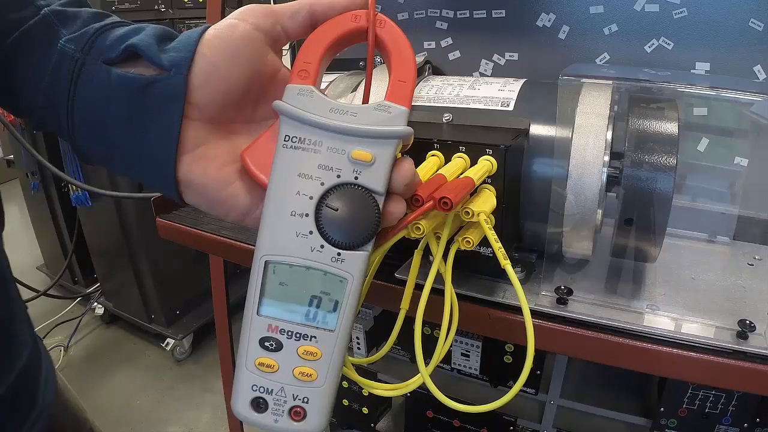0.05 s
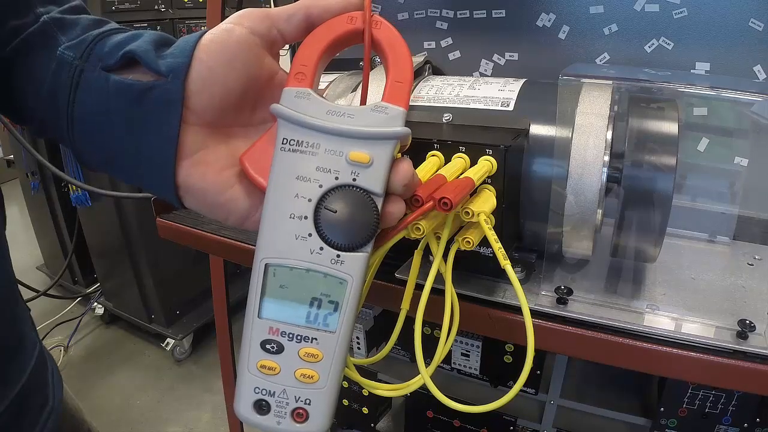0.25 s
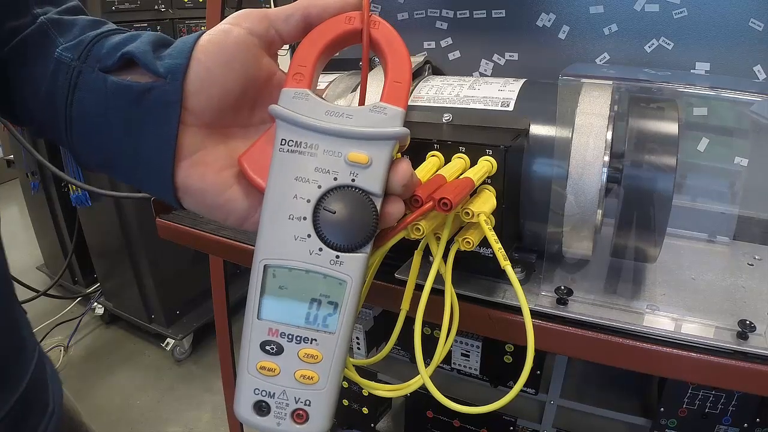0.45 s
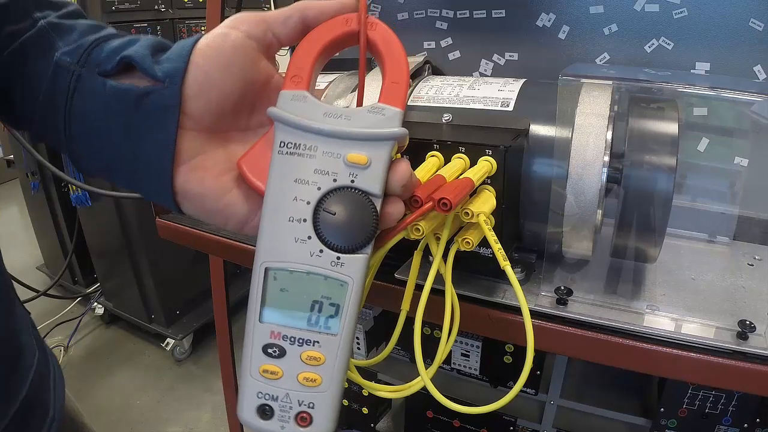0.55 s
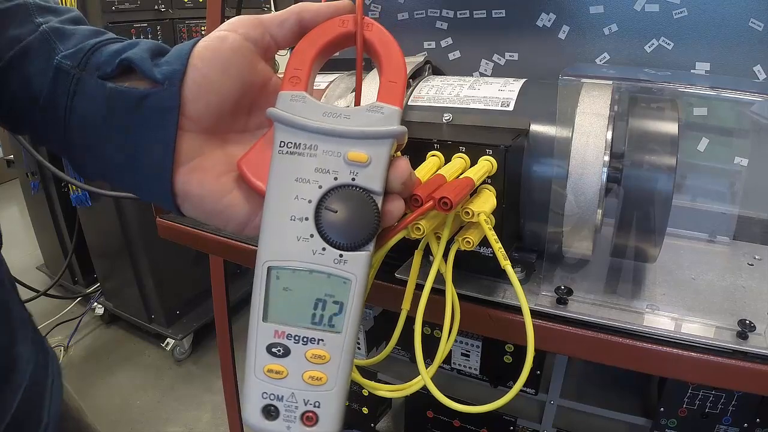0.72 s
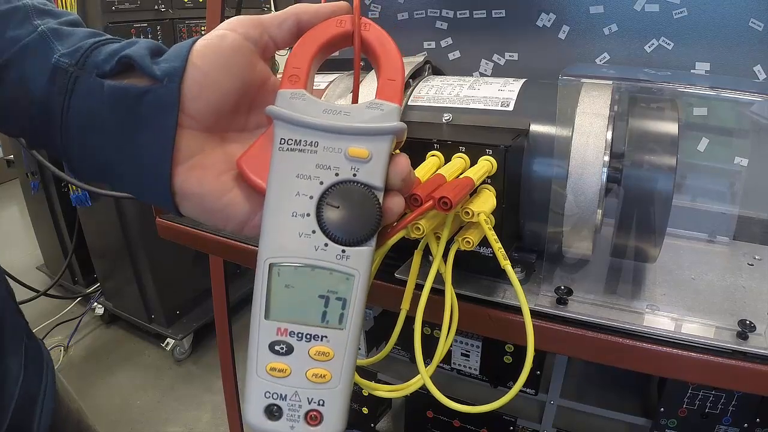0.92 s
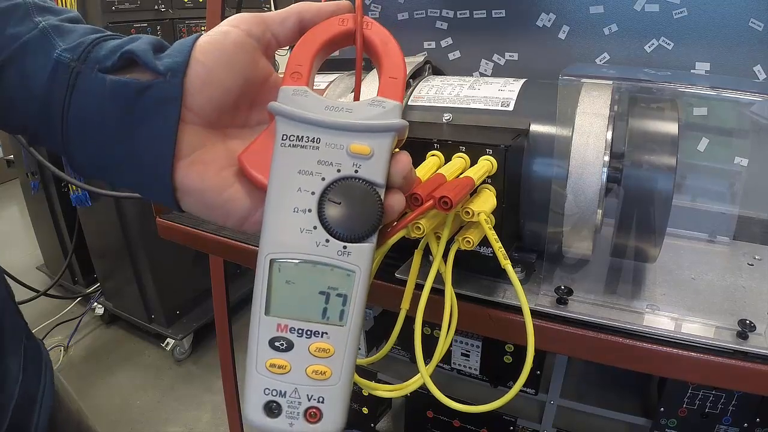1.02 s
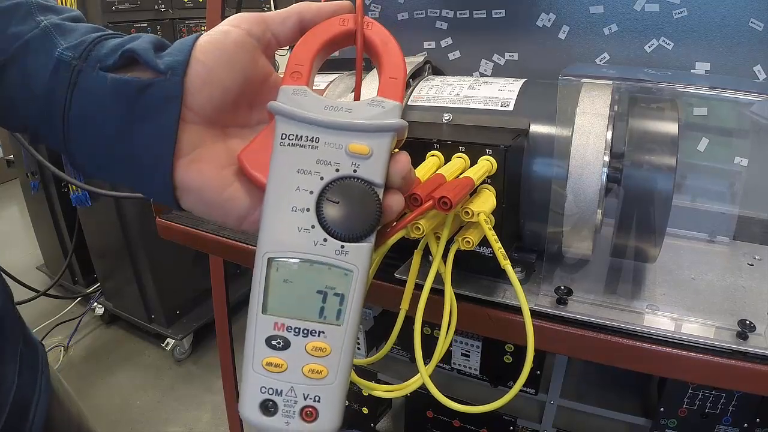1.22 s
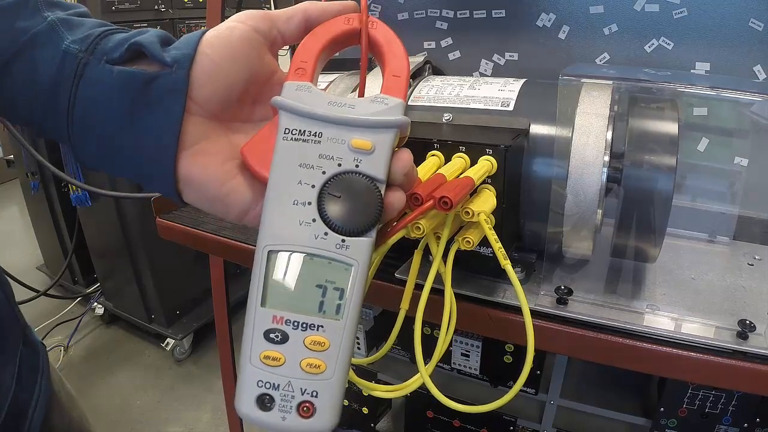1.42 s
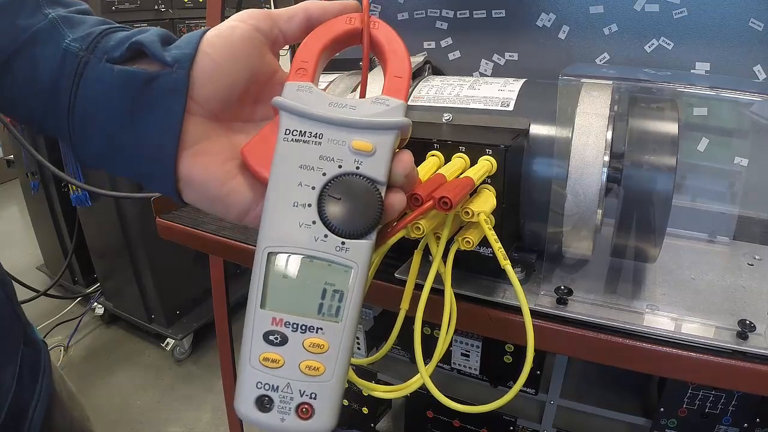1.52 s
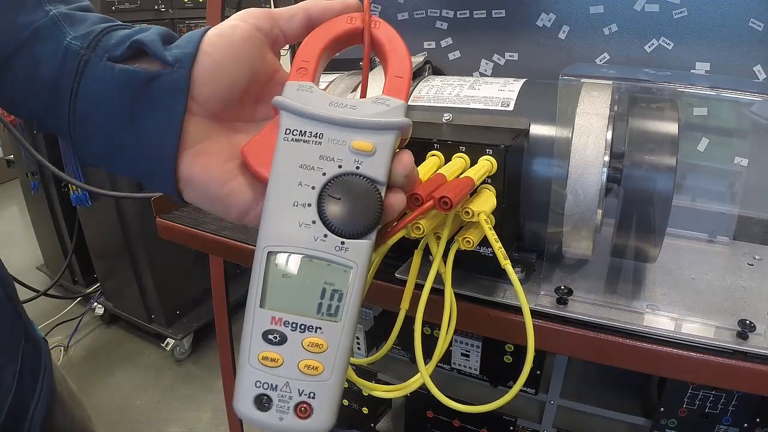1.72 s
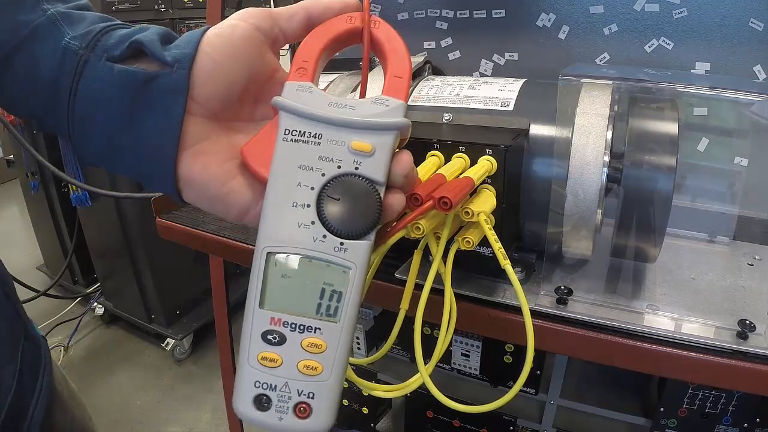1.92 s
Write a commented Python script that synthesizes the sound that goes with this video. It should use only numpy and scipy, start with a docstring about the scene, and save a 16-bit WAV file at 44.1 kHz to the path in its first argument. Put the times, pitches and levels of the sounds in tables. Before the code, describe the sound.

An electric motor clacks on, whines quickly up in pitch, rattles briefly, then settles into humming

```python
"""A quiet room; then a four-pole induction motor on a bench is switched straight onto 60 Hz mains.
The switch clacks and bounces, and the rotor slots whine upward as tones through the ringing frame.
Then a loose metal part rattles: short taps and grainy noise ring thin metal. The motor settles to a hum
of shaft tones and a noisy roar that knocks at about 30 turns a second. Throughout, a small camera
microphone, nearly mono, adds faint mirror copies of the low sound in the treble."""
import sys
import numpy as np
from scipy import signal
from scipy.fft import rfft, irfft
from scipy.io import wavfile
from scipy.ndimage import uniform_filter1d

SR = 44100
rng = np.random.default_rng(int(sys.argv[2]) if len(sys.argv) > 2 else 0)


def dump(signal):
    """Clip the signal to [-1, 1] and save it as 16-bit WAV at the path in sys.argv[1]."""
    limited = np.clip(np.atleast_2d(signal).T, -1, 1)
    pcm = np.round(limited * 32767).astype(np.int16)
    wavfile.write(sys.argv[1], SR, pcm)


def natural_amplitude(level_db):
    """Convert a level in decibels to a linear amplitude factor, elementwise."""
    exponent = np.asarray(level_db, float) / 20
    return 10 ** exponent


N = 85995
T = np.arange(N) / SR  # time [s]
MAINS_HZ = 60


def unit(x):
    """Scale to rms 1."""
    return x / np.sqrt(np.mean(x ** 2))


def curve(rows, col=1):
    """Draw straight lines through one table column over time."""
    return np.interp(T, [r[0] for r in rows], [r[col] for r in rows])


def walk(rate_hz):
    """Wander at random with rms 1: levels held for 1 / rate_hz seconds, then smoothed twice."""
    hold = int(SR / rate_hz)
    steps = np.repeat(rng.standard_normal(N // hold + 1), hold)
    smooth = uniform_filter1d(uniform_filter1d(steps, hold), hold)
    return unit(smooth[:N])


def coloured(points):
    """Make noise of rms 1 whose spectrum follows (frequency [Hz], relative level [dB per Hz])."""
    log_hz = np.log(np.arange(N // 2 + 1) * SR / N + 1)
    p = np.array(points)
    gain = natural_amplitude(np.interp(log_hz, np.log(p[:, 0]), p[:, 1]))
    return unit(irfft(rfft(rng.standard_normal(N)) * gain, N))


def bell(centre_s, width_s):
    """Make a smooth bump of height 1 in time."""
    return np.exp(-((T - centre_s) / width_s) ** 2)


def ring(x, modes, between_db):
    """Add resonances side by side, each scaled at its centre, to a flat share of the input."""
    out = natural_amplitude(between_db) * x
    for hz, width, db in modes:
        out = out + natural_amplitude(db) * signal.lfilter(*signal.iirpeak(hz, hz / width, SR), x)
    return out


def band(x, lo_hz, hi_hz):
    """Keep one band of frequencies, with steep edges."""
    return signal.sosfilt(signal.butter(3, [lo_hz, hi_hz], "bandpass", fs=SR, output="sos"), x)


# rotor speed and magnetic pull:
# (time [s], slots passing [Hz], level of the top whine line before throb and frame [dB])
SPIN = [(.25, 19.77, -44), (.3, 95, -23), (.365, 200, -38.5), (.416, 278, -32), (.5, 428, -30),
        (.545, 525, -40), (.575, 588, -28.5), (.6, 628, -29), (.64, 673, -29.5), (.68, 775.4, -34),
        (.752, 930, -24.5), (.775, 965, -36.5), (.81, 1030, -36.5), (.87, 1000, -38), (.95, 1215, -57.5),
        (1.02, 1285, -55.5), (1.15, 1312, -63.5), (1.95, 1318, -46.5)]


def rotor():
    """Add up the slot rate to get the slot phase and the shaft angle, zero at the tight spot."""
    slot_count, knock_s = 44, 1.681  # knock_s: a moment when the tight spot passes
    slot_hz = curve(SPIN)
    slot_phase = 2 * np.pi * np.cumsum(slot_hz) / SR
    shaft = (slot_phase - np.interp(knock_s, T, slot_phase)) / slot_count
    return slot_hz, slot_phase, shaft, curve(SPIN, col=2)


# whine lines, as steps of twice the mains away from the slot rate: [steps]
WHINE_STEPS = [1, 0, -2, -5, -8]
# the three lowest lines against the top one:
# (time [s], level at step -2 [dB], level at step -5 [dB], level at step -8 [dB])
WHINE_SHARES = [(.6, -44, -50, -30), (.655, -29, -45, -48), (.685, -4, -45, -47), (.715, -12.5, -50, -50.5),
                (.78, -1.5, -51, -42), (.81, -8, -38, -31), (.88, 5, -41, -40.5), (.96, 17.5, 3, 7),
                (1.05, 0, 14.5, 6), (1.12, 3, -4, -25), (1.95, -7, -14, -31)]


def slot_whine(slot_phase, shaft, top_db):
    """Passing slots sing at their rate shifted by mains steps, throbbing with the turn and the mains."""
    slot_line_db, wander_rad = -12, 0.4  # plain slot rate against the top line; unsteady phase
    turn_depth, mains_depth = 0.35, 0.25
    low_db = [curve(WHINE_SHARES, col=c + 1) for c in range(len(WHINE_STEPS) - 2)]
    whine = 0
    for step, db in zip(WHINE_STEPS, [0, slot_line_db] + low_db):
        level = natural_amplitude(db + 1.5 * walk(60.8))
        phase = slot_phase + 4 * np.pi * step * MAINS_HZ * T + wander_rad * walk(39.5)
        whine = whine + level * np.sqrt(2) * np.sin(phase)
    throb = 1 + turn_depth * np.cos(shaft) + mains_depth * np.cos(2 * np.pi * MAINS_HZ * T)
    return band(whine * natural_amplitude(top_db) * throb, 156, 1310)


# jolts of the frame as the current bites: (time [s], peak level before filtering and frame [dB])
JOLTS = [(.247, -11), (.259, -8.5), (.271, -8.5), (.29, -14)]


def current_jolts():
    """The current jerks the frame in short pulses that push and pull by turns."""
    pulses = sum((-1) ** k * natural_amplitude(db) * bell(s, 0.0004) for k, (s, db) in enumerate(JOLTS))
    return band(pulses, 260, 1330)


# frame and bench resonances: (frequency [Hz], width [Hz], gain [dB])
FRAME = [(336.4, 16.8, 6.5), (453, 23, -11.5), (543, 16, 1), (647, 130, -8.5), (727.8, 10.1, 6.5),
         (763, 7.2, 2.5), (833, 14, -2.5), (931, 16, 1), (1010.6, 11.4, 2.5), (1041.4, 12.7, 1),
         (1292, 26, -9.5)]


def ring_frame(x):
    """The frame and bench ring at their own pitches."""
    return ring(x, FRAME, between_db=-10)


# shaking of the ringing frame: (time [s], level [dB])
SHAKE = [(.245, -28.5), (.26, -33.5), (.3, -33.5), (.37, -29), (.44, -40), (.6, -35.5), (.7, -43),
         (.8, -47), (1.0, -41), (1.2, -45.5), (1.95, -59)]


def shaking():
    """Rough shaking, made of noise, rings the frame."""
    return unit(ring_frame(band(rng.standard_normal(N), 231, 974))) * natural_amplitude(curve(SHAKE))


# tones of the hum, as multiples of the shaft rate: [order]
HUM_ORDERS = [1, 7, 8, 9, 10, 11, 21, 25, 26, 27]
# their levels at full speed, before the slow easing and wander: [dB]
HUM_DB = [-49, -62, -53.5, -60.5, -53.5, -44, -58, -58.5, -65, -53]


def shaft_hum(shaft, slot_hz):
    """Tones locked to the shaft grow steeply with speed; the upper ones ease as the current settles."""
    speed_power, sag_db_s = 15.7, -2.5  # sag counts from 1.2 s
    hum = 0
    for order, db in zip(HUM_ORDERS, HUM_DB):
        sag_db = (order > 1) * sag_db_s * (T - 1.2)
        level = natural_amplitude(db + 0.6 * walk(6) + sag_db)
        hum = hum + level * np.sqrt(2) * np.cos(order * shaft + 0.3 * walk(3))
    return hum * (slot_hz / slot_hz[-1]) ** speed_power


def knocking(shaft):
    """Once a turn, at the tight spot, the gain jumps and then returns to rest."""
    swell_db, fade_turns = 3.5, 0.19
    since_knock = shaft / (2 * np.pi) % 1  # part of a turn
    return natural_amplitude((swell_db + 2.9 * walk(29.88)) * np.exp(-since_knock / fade_turns))


# colour of the roar: (frequency [Hz], relative level [dB per Hz])
ROAR = [(90, -35), (150, -21), (250, -2.5), (350, 0), (445, -13.5), (620, -7), (800, 0), (920, -4.5),
        (1040, -3), (1330, -12.5), (1700, -25.5), (2200, -71)]
# loudness of the roar: (time [s], level [dB])
ROAR_CURVE = [(.245, -44), (.5, -54), (.85, -44.5), (1.05, -45), (1.95, -43.5)]


def rotor_roar(knock):
    """The running rotor roars as broad noise that swells with the knock."""
    return unit(coloured(ROAR) * knock) * natural_amplitude(curve(ROAR_CURVE))


# colour of fan and bearings: (frequency [Hz], relative level [dB per Hz])
HISS = [(710, -14.5), (1200, -4), (1350, -7), (1630, -14.5), (1910, -6), (2650, -13), (13000, -35),
        (15000, -38), (16000, -69)]
# loudness of the hiss before wander and knock: (time [s], level [dB])
HISS_CURVE = [(.245, -41.5), (.3, -43.5), (.44, -57), (.6, -53.5), (.82, -57.5), (1.0, -52.5), (1.2, -55.5),
              (1.95, -57.5)]


def fan_hiss(knock):
    """Fan and bearings hiss as unsteady noise that follows the knock more gently."""
    level = natural_amplitude(curve(HISS_CURVE) + 1.57 * walk(40.14))
    return coloured(HISS) * level * unit(knock ** 0.58)


# bench rumble: (time [s], level [dB])
RUMBLE = [(.245, -67), (.3, -47), (.7, -59.5), (1.2, -59.5), (1.95, -50)]


def bench_rumble():
    """The bench rumbles as deep noise."""
    return unit(band(rng.standard_normal(N), 24, 300)) * natural_amplitude(curve(RUMBLE))


def motor():
    """Whine and jolts ring the frame; shaking, roar, hum, hiss and rumble add to it."""
    slot_hz, slot_phase, shaft, top_db = rotor()
    knock = knocking(shaft)
    rung = ring_frame(slot_whine(slot_phase, shaft, top_db) + current_jolts())
    noises = shaking() + rotor_roar(knock) + fan_hiss(knock) + bench_rumble()
    return rung + noises + shaft_hum(shaft, slot_hz)


# thin metal of the switch and the loose part: (frequency [Hz], width [Hz], gain [dB])
TIN = [(2210, 67, -15), (2630, 77, 2.5), (2990, 170, 2), (3306, 79, 13.5), (3532, 62, 20), (3610, 70, 20),
       (3710, 40, 14.5), (4320, 68, -22), (6300, 700, -4.5), (7700, 33, -14), (11400, 1200, -11.5),
       (15700, 1200, -8)]
# clicks of metal on metal, switch bounce then rattle: (time [s], peak level before filtering [dB])
CLICKS = [(.2468, -21.5), (0.25, -16.5), (0.2552, -16), (0.2612, -13.5), (0.2641, -31), (0.2748, -26.5),
          (0.2878, -20), (0.894, -47), (0.935, -47), (0.951, -60), (.971, -34.5), (.984, -40), (1.005, -40),
          (1.017, -35), (1.029, -51), (1.041, -43), (1.052, -35.5), (1.064, -35.5), (1.087, -38),
          (1.097, -44), (1.119, -39), (1.129, -44), (1.151, -50), (1.163, -54), (1.183, -46), (1.196, -51),
          (1.215, -45.5), (1.251, -53), (1.283, -49)]
# buzz of the thin metal before its grain, loud at the switch-on, then dying away with short returns:
# (time [s], level [dB])
BUZZ = [(.245, -26), (.27, -27.5), (.302, -37.5), (.37, -41), (.44, -52.5), (.536, -61), (.572, -50.5),
        (.615, -54.5), (.64, -58.5), (.85, -72), (.97, -58), (1.12, -62), (1.2, -68.5), (1.95, -72)]


def tin():
    """Short taps and grainy noise ring the thin metal; one bright snap ends the switch bounce."""
    tin_between_db, click_s, crack_s = -43, 0.00005, 0.0013
    taps = band(sum(natural_amplitude(db) * bell(s, click_s) for s, db in CLICKS), 2200, 4150)
    noise = rng.standard_normal(N)
    # scraping noise within each tap
    cracks = natural_amplitude(-21) * sum(natural_amplitude(db) * bell(s + crack_s / 2, crack_s) for s, db in CLICKS)
    grain_db = 1.4 * walk(200)
    rung_rms = np.std(ring(noise, TIN, tin_between_db))
    buzz = noise * (cracks + natural_amplitude(curve(BUZZ) + grain_db)) / rung_rms
    # last, brighter bounce of the switch
    snap = natural_amplitude(-37) * unit(band(noise, 3000, 12000)) * bell(0.2895, crack_s)
    return ring(taps + buzz, TIN, tin_between_db) + snap


# colour of the quiet room: (frequency [Hz], relative level [dB per Hz])
ROOM = [(12, -25), (20, -0.5), (48, 4), (85, -9), (116, 0), (140, -15), (174, -3.5), (195, -13.5),
        (376, -11.5), (551, -19.5), (632, -17.5), (1290, -30), (4000, -39), (14000, -53.5)]


def room():
    """The room is steady, soft noise."""
    return coloured(ROOM) * natural_amplitude(-56.5)


def bass_side(mid):
    """Deep noise and a little of the shared bass make left and right differ."""
    noise = unit(band(rng.standard_normal(N), 25, 160)) * natural_amplitude(-68)
    return noise - natural_amplitude(-20) * band(mid, 11, 140)


def scene():
    """Motor and metal start with the switch, over the room; only the deep bass differs left and right."""
    on_s, fade_s = 0.2427, 0.003
    switched_on = np.clip((T - on_s) / fade_s, 0, 1)
    mid = (motor() + tin()) * switched_on + room()
    side = bass_side(mid)
    return np.array([mid + side, mid - side])


# mirror copies around 1, 2, 3 and 4 times a fixed tone: level of each copy [dB]
MIRROR_DB = [-36, -41, -44, -46]


def mirror_copies(dry):
    """Multiplying the low sound by fixed tones copies it, mirrored, to both sides of each tone."""
    mirror_hz = 3901
    carrier = 0
    for k, db in enumerate(MIRROR_DB):
        carrier = carrier + 2 * natural_amplitude(db) * np.cos(2 * np.pi * (k + 1) * mirror_hz * T)
    return band(dry, 100, 1500) * carrier


def band_limit(x):
    """A steep low-pass at the top of the band."""
    return signal.sosfilt(signal.butter(12, 16740, fs=SR, output="sos"), x)


def record(dry):
    """The microphone adds faint mirror copies of the low sound; the very top is cut."""
    top_cut = signal.ellip(8, 0.2, 60, 15750, fs=SR, output="sos")
    mix = signal.sosfilt(top_cut, dry + mirror_copies(dry))
    return band_limit(mix)


dry = scene()
out = record(dry)
dump(out)
```